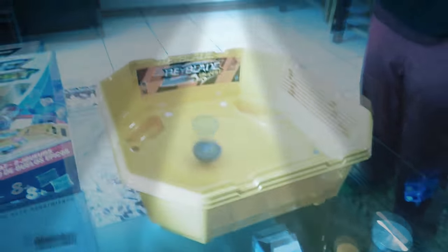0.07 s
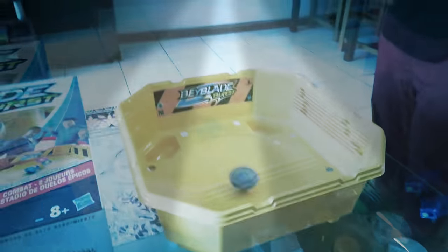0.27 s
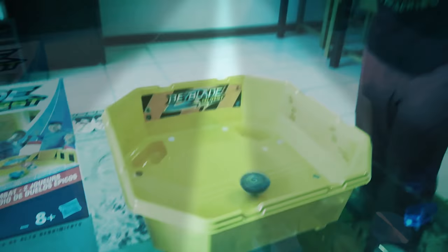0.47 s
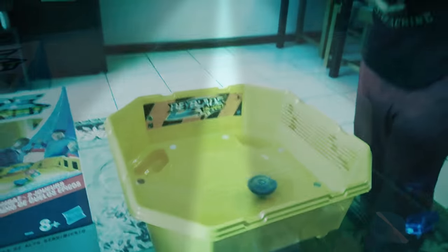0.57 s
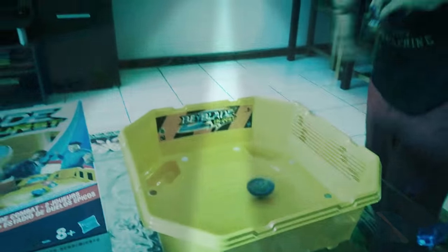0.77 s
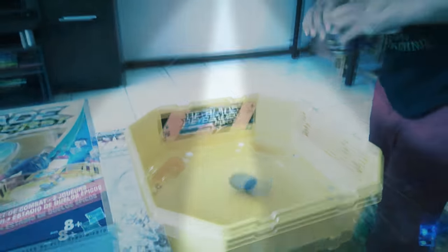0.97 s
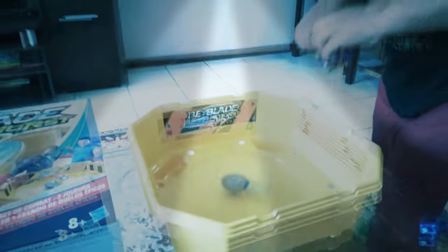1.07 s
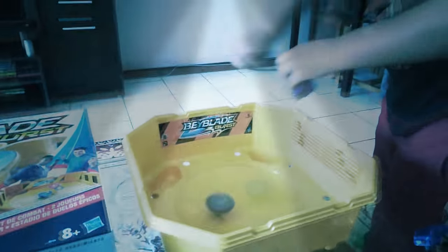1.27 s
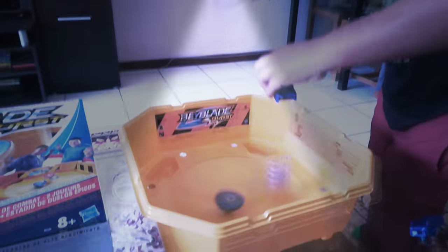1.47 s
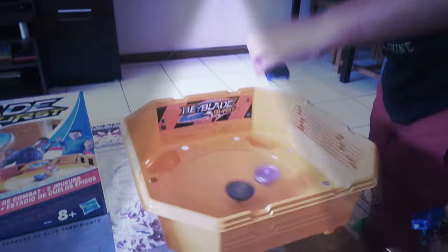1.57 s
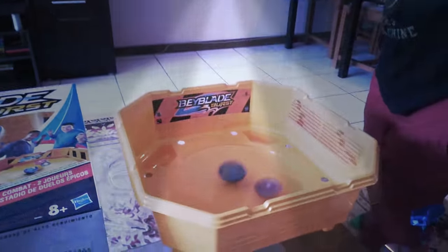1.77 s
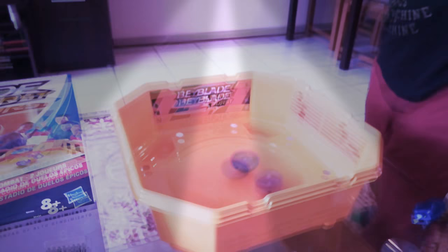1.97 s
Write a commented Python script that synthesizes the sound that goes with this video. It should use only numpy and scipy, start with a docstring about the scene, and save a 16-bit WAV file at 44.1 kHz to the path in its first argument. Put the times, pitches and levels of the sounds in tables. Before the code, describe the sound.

Spinning tops in a plastic arena, snapped together, launched by ripcord, then dropping and knocking

```python
"""A spinning top hums and scrapes softly on a plastic stadium's floor, over room noise and a low rumble.
A second top is snapped tight with four hard clacks: noise cracks over a ring of modes, in a tiled room.
The ripcord zips into the launcher and is pulled: teeth make noise bursts, and the gear whirrs on.
The top drops in with a hollow thump of shell modes and clatter, then knocks against the wall and the other
top with dry noise ticks, while its whirr flutters as resonant noise."""
import sys
import numpy as np
from scipy import signal
from scipy.fft import rfft, irfft, next_fast_len
from scipy.io import wavfile
from scipy.ndimage import map_coordinates

SR = 44100
rng = np.random.default_rng(int(sys.argv[2]) if len(sys.argv) > 2 else 0)


def store_pcm(level_fs):
    """Save levels as 16-bit WAV."""
    pcm = np.round(np.clip(level_fs, -1, 1) * 32767).astype(np.int16)
    wavfile.write(sys.argv[1], SR, np.atleast_2d(pcm).T)


N = 88200
T = np.arange(N) / SR


def amp(db):
    """Decibels to linear gain."""
    return 10 ** (np.asarray(db) / 20)


def unit(x):
    """x scaled to rms 1."""
    return x / np.sqrt(np.mean(x ** 2) + 1e-20)


def along(points, hz):
    """Read (frequency [Hz], value) points on a log frequency axis."""
    point_hz, values = np.transpose(points)
    return np.interp(np.log(hz + 1), np.log(point_hz + 1), values)


def curves(rows):
    """One curve over time for each column after the time."""
    times, *columns = np.transpose(rows)
    return [np.interp(T, times, column) for column in columns]


def during(rows):
    """True from the first row's time to the last."""
    return (T >= rows[0][0]) & (T <= rows[-1][0])


def wobble(rate):
    """A smooth random curve with rate knots a second."""
    knots = rng.standard_normal(int(N * rate / SR) + 4)
    return map_coordinates(knots, [T * rate])


def fade(t60):
    """Exponential decay, down 60 dB after t60 seconds; 1 - fade is a soft onset."""
    return np.exp(-np.log(1000) * T / t60)


def at(x, s):
    """Delay stereo x by s seconds."""
    return np.pad(x, ((0, 0), (round(s * SR), 0)))[:, :N]


def pan(db):
    """Left and right gains; positive dB favours the left."""
    return amp([[db / 2], [-db / 2]])


def filtered(x, response):
    """x times a response of frequency, padded so that its end does not wrap round."""
    size = 2 * next_fast_len(N)
    hz = np.fft.rfftfreq(size, 1 / SR)
    return irfft(rfft(x, size) * response(hz), size)[..., :N]


def resonant(x, peaks):
    """x through parallel resonances of alternating sign, at rms 1."""
    def response(f):
        total = 0
        for k, (centre, width, db) in enumerate(peaks):
            band = 1j * f * width / (centre ** 2 - f ** 2 + 1j * f * width)
            total = total + (-1) ** k * amp(db) * band
        return total
    return unit(filtered(x, response))


def coloured(x, colour):
    """x with a broad colour, at rms 1."""
    return unit(filtered(x, lambda f: amp(along(colour, f))))


def noise(apart_hz=600, width=1.0):
    """Stereo white noise, alike in the bass and parting in the treble."""
    def turn(f):
        return np.arctan(width * f / (f + apart_hz))
    mid, side = rng.standard_normal((2, N))
    mid = filtered(mid, lambda f: np.cos(turn(f)))
    side = filtered(side, lambda f: np.sin(turn(f)))
    return np.array([mid + side, mid - side])


def dying(x, t60s):
    """x with each frequency fading at its own speed."""
    hz, t, z = signal.stft(x, SR, nperseg=256)
    decay = amp(-60 * t / along(t60s, hz)[:, None])
    return signal.istft(z * decay, SR, nperseg=256)[1][:, :N]


def ring(modes, detune, spread):
    """Struck modes, retuned a little at each blow, their phases parting left from right in the treble."""
    out = 0
    for hz, db, t60 in modes:
        phase = rng.uniform(0, 2 * np.pi) + spread * hz / (hz + 500) * rng.standard_normal((2, 1))
        mode_hz = hz * (1 + detune * rng.standard_normal())
        out = out + amp(db) * fade(t60) * np.sin(2 * np.pi * mode_hz * T + phase + 0.5 * wobble(60))
    return out


STRIKE_RIPPLE_DB, STRIKE_RIPPLE_HZ = 2.5, 650  # random spread and spacing of the colour's knots


def struck_anew(x):
    """Each blow lands on another spot and brings out other resonances."""
    gains_db = STRIKE_RIPPLE_DB * rng.standard_normal(SR // STRIKE_RIPPLE_HZ)
    return unit(filtered(x, lambda f: amp(map_coordinates(gains_db, [f / STRIKE_RIPPLE_HZ]))))


# decay of the tiled room: (frequency [Hz], t60 [s])
ROOM_DECAY = [(150, 0.51), (1000, 0.53), (4000, 0.42), (8000, 0.35), (15000, 0.18)]
# bounces off nearby surfaces: (delay [s], level before echo_db [dB], left over right [dB])
NEAR_BOUNCES = [(.0078, -18, -4.5), (0.0137, -15.5, 0.5), (0.0216, -25.5, 5.5)]


def room(x, wet_db, echo_db=0):
    """Direct sound, bounces off nearby surfaces and the room's diffuse tail."""
    tail = dying(noise(apart_hz=195, width=0.92), ROOM_DECAY)
    tail = tail * (1 - fade(0.014)) * amp(1.3 * wobble(408))
    tail = at(tail, .006) / np.linalg.norm(tail[0])
    early = sum(amp(db + echo_db) * pan(pan_db) * at(x, s) for s, db, pan_db in NEAR_BOUNCES)
    return x + early + amp(wet_db) * signal.fftconvolve(x, tail, axes=1)[:, :N]


# swell of the low rumble: (time [s], level [dB])
RUMBLE_LEVEL = [(0, -62.5), (.17, -54), (.3, -64), (.6, -69.5), (1.0, -63), (1.45, -73), (1.6, -55),
                (2, -65)]
# tone of the rumble: (frequency [Hz], level [dB])
RUMBLE_TONE = [(20, -2), (65, -7.5), (95, 4), (130, -6), (300, -31.5)]
# tone of the steady room noise: (frequency [Hz], level [dB])
ROOM_NOISE_TONE = [(25, -0.5), (150, -8), (400, -11), (1300, -5.5), (15000, -30)]
ROOM_NOISE_DB = -67


def background():
    """Low rumble and faint room noise, both coloured noise."""
    rumble_db, = curves(RUMBLE_LEVEL)
    rumble = amp(rumble_db) * coloured(noise(), RUMBLE_TONE)
    return rumble + amp(ROOM_NOISE_DB) * coloured(noise(), ROOM_NOISE_TONE)


# tips running on the floor: (time [s], hum level [dB], scrape level [dB])
ROLL_LEVELS = [(0, -53.5, -46.5), (.1, -55.5, -48.5), (.2, -65.5, -53), (.55, -69.5, -56), (.75, -70, -76),
               (.9, -56, -55), (1.04, -56, -95), (1.14, -68.5, -64.5), (1.35, -62.5, -53.5),
               (1.5, -59.5, -55.5), (1.8, -44.5, -46), (2, -80, -61)]
# resonances of the hum: (centre [Hz], width [Hz], level [dB])
HUM_RESONANCES = [(144.2, 6.1, 6), (222.3, 52, -7.5)]
# tone of the scrape: (frequency [Hz], level [dB])
SCRAPE_TONE = [(200, -11), (850, -12), (1150, 4.5), (1500, -1), (1900, 3), (3200, -6.5), (7000, -4.5),
               (10000, -16.5), (15000, -17.5)]


def rolling():
    """Spinning tips make the stadium floor hum and scrape over it."""
    hum_db, scrape_db = curves(ROLL_LEVELS)
    hum = amp(hum_db) * resonant(noise(), HUM_RESONANCES)
    scrape = amp(scrape_db + 0.52 * wobble(99)) * coloured(noise(), SCRAPE_TONE)
    return hum + scrape


# handling of the launcher: (time [s], level [dB])
SCUFF_LEVEL = [(.965, -66), (1.005, -51), (1.025, -47.5), (1.07, -55), (1.12, -61)]
# tone of the rub: (frequency [Hz], level [dB])
SCUFF_TONE = [(70, -10), (150, -3), (600, -7), (1400, -0.5), (2300, -5), (5000, -11.5), (9000, -19.5),
              (15000, -29)]


def scuff():
    """A soft rub, as coloured noise, as the launcher is gripped and raised."""
    level_db, = curves(SCUFF_LEVEL)
    level = amp(level_db + 2.2 * wobble(78.5)) * during(SCUFF_LEVEL)
    return room(level * pan(-7.5) * coloured(noise(), SCUFF_TONE), wet_db=-11.5)


# the fresh top's whirr: (time [s], level [dB])
WHIRR_LEVEL = [(1.45, -72), (1.48, -45.5), (1.76, -45.5), (2, -57.5)]
# resonances of the whirr: (centre [Hz], width [Hz], level [dB])
WHIRR_RESONANCES = [(2814, 190, 1), (6760, 3600, -14)]


def whirr():
    """The freshly launched top whirrs as resonant noise, fluttering as it wobbles."""
    level_db, = curves(WHIRR_LEVEL)
    level = amp(level_db + 3.8 * wobble(70.36)) * during(WHIRR_LEVEL)
    return level * resonant(noise(), WHIRR_RESONANCES)


# ripcord fed in: (time [s], level [dB], tooth rate [1/s])
FEED_MOTION = [(.612, -75, 380), (.622, -46, 453), (.70, -45.5, 646), (.75, -43.5, 684), (.81, -44, 720),
               (.875, -48, 496), (.905, -73.5, 390)]
# tone of the feeding teeth: (frequency [Hz], level [dB])
FEED_TONE = [(200, -10.5), (1400, -1.5), (1900, -7), (2700, 2.5), (4200, 1), (6000, 4), (8000, 1),
             (11000, -9.5), (15000, -28)]
# whine of the sliding cord: (settled centre [Hz], width [Hz], level [dB])
WHINE_BANDS = [(2446, 260, -5.5), (3620, 260, -6.5), (5020, 200, 2.5), (6630, 360, -5)]
# faint low tone as the cord goes in: (time [s], pitch [Hz], level [dB])
LOW_TONE = [(.62, 570, -75), (.68, 633, -61.5), (.74, 730, -76)]
WHINE_FLAT, WHINE_RISE_S = 0.04, 0.17  # starts this share flat and settles over this time
WHINE_DB, WHINE_BITE_DB = -3.5, 4  # settled level, and the extra while the cord is still slow


def cord_feed():
    """The cord zips in softly; its whine bites at once and rises as it gets up to speed."""
    level_db, rate = curves(FEED_MOTION)
    turns = np.cumsum(rate * (1 + 0.041 * wobble(90))) / SR
    teeth = unit(np.exp(-(turns % 1) / rate / 0.00032) * amp(0.93 * wobble(100)))
    slow = np.exp(-(np.maximum(T - FEED_MOTION[0][0], 0) / WHINE_RISE_S) ** 2)
    clock = np.cumsum(1 - WHINE_FLAT * slow) / SR  # runs slow at first, so all bands start flat

    def band(hz, width):
        drift = wobble(width) + 1j * wobble(width)
        return np.real(drift * np.exp(2j * np.pi * hz * clock))

    def whine_channel():
        return sum(amp(db) * band(hz, width) for hz, width, db in WHINE_BANDS)

    whine = unit(np.array([whine_channel(), whine_channel()]))
    zip_noise = coloured(teeth * noise(), FEED_TONE)
    cord = amp(WHINE_DB + WHINE_BITE_DB * slow) * whine + amp(-5) * zip_noise
    tone_hz, tone_db = curves(LOW_TONE)
    tone = unit(np.sin(2 * np.pi * np.cumsum(tone_hz) / SR))
    tone = amp(tone_db + 1.8 * wobble(76.7)) * during(LOW_TONE) * tone
    return room((cord * amp(level_db) * during(FEED_MOTION) + tone) * pan(-3.5), wet_db=-7.5)


def ratchet(motion, peaks, colour, rasp_db, scatter_db, tooth_s):
    """Teeth slip past a pawl: every tooth is a tiny burst that rings the launcher's case."""
    level_db, rate = curves(motion)
    turns = np.cumsum(rate * (1 + .08 * wobble(90))) / SR
    size = amp(scatter_db * rng.standard_normal(N))[turns.astype(int)]  # one size per tooth
    teeth = size * np.exp(-(turns % 1) / rate / tooth_s) * during(motion)
    sound = resonant(teeth * noise(), peaks) + amp(rasp_db) * coloured(teeth * noise(), colour)
    # rms 1 while moving, not over the whole length
    return unit(sound) * np.sqrt(during(motion).mean()) * amp(level_db)


# ripcord pulled: (time [s], level [dB], tooth rate [1/s])
PULL_MOTION = [(1.165, -50.5, 250), (1.203, -48.5, 370), (1.238, -26.5, 690), (1.254, -36, 770),
               (1.265, -24, 1200), (1.276, -23.5, 1340), (1.288, -51, 1180), (1.35, -35, 680),
               (1.385, -45, 580), (1.41, -76, 670)]
# case resonances under the pull: (centre [Hz], width [Hz], level [dB])
PULL_RESONANCES = [(7020, 280, 0.5), (7840, 320, -1), (9650, 1600, -8)]
# tone of the pull's rasp: (frequency [Hz], level before rasp_db [dB])
PULL_TONE = [(400, -37), (1400, -19), (3700, -4), (5500, 5.5), (7500, 6.5), (10500, 4.5), (12500, -3.5),
             (15500, -20)]
# gear whirring on: (time [s], level [dB], knock rate [1/s])
GEAR_MOTION = [(1.16, -47, 102), (1.21, -45.5, 132), (1.26, -36.5, 200), (1.31, -35, 160),
               (1.365, -37, 130), (1.39, -46, 145), (1.46, -76, 52)]
# case resonances under the gear: (centre [Hz], width [Hz], level [dB])
GEAR_RESONANCES = [(2610, 234, -2.5), (2840, 480, -6.5), (3175, 270, -7.5), (5860, 270, -10.5)]
# tone of the gear's rasp: (frequency [Hz], level before rasp_db [dB])
GEAR_TONE = [(500, -35), (1350, 9.5), (2000, -4), (2700, 16), (3700, 7), (9000, -3)]


def launcher():
    """The cord is ripped out over fine teeth and leaves the gear whirring with even knocks."""
    pull = ratchet(PULL_MOTION, PULL_RESONANCES, PULL_TONE, rasp_db=-1.0, scatter_db=2.2, tooth_s=0.0011)
    gear = ratchet(GEAR_MOTION, GEAR_RESONANCES, GEAR_TONE, rasp_db=-5.5, scatter_db=1.2, tooth_s=0.0022)
    return room(pull * pan(3.6) + gear * pan(0.15), wet_db=-4.0)


# light clicks of hard parts: (time [s], level before a common lift [dB], left over right [dB])
CLICK_HITS = [(1.163, -37.5, 1.5), (1.21, -46, 6), (1.455, -40, 13), (1.486, -38.5, 9), (1.5250, -17.5, 7),
              (1.6083, -29, 8.5), (1.6470, -21.5, 6), (1.6594, -19, 0), (1.672, -36, -7),
              (1.6990, -16.5, 3), (1.725, -27.5, 2), (1.7892, -35, 2)]
# tone of the clicks: (frequency [Hz], level [dB])
CLICK_TONE = [(300, -24), (2200, -1), (4700, 6.5), (5700, 1.5), (7200, 7), (9300, 1.5), (12500, -7),
              (15200, -4.5)]


def clicks():
    """Hard parts touch: dry noise ticks, each with its own colour."""
    out = 0
    for s, db, pan_db in CLICK_HITS:
        tick = struck_anew(coloured(noise(), CLICK_TONE)) * fade(0.025) * (1 - fade(0.00077))
        out = out + at(amp(db + 0.5) * pan(pan_db) * tick, s)
    return room(out, wet_db=-7.0)


# blows on the stadium: (time [s], clatter level [dB], boom level [dB])
THUMP_HITS = [(0.2446, -41, -56), (1.5266, -15.5, -24), (1.545, -35, -40), (1.6070, -31.5, -37.5),
              (1.6610, -30.5, -46), (1.7277, -28, -44.5), (1.7312, -28, -42), (1.7940, -37.5, -53)]
# modes of the stadium's shell: (frequency [Hz], level [dB], t60 [s])
SHELL_RING = [(88, -17.5, .25), (141.8, -8, 0.4), (208, -1.5, 0.24), (533, -9.5, 0.15), (661.5, 1, 0.17),
              (766, -7, .18), (1048, 1, 0.11), (1358, 0.5, 0.15), (1823, -14, 0.12)]
# tone of the clatter: (frequency [Hz], level [dB])
CLATTER_TONE = [(25, -33.5), (55, -8), (120, -1.5), (220, -1.5), (310, -4), (480, -4), (1400, 3.5),
                (2700, 0.5), (4500, -5.5), (8000, -34.5)]
# decay of the clatter: (frequency [Hz], t60 [s])
CLATTER_DECAY = [(150, 0.48), (1000, 0.18), (3000, 0.046), (10000, 0.045)]


def thumps():
    """The thin shell booms in a few modes over a dense, quickly dying clatter."""
    out = 0
    for s, clatter_db, boom_db in THUMP_HITS:
        clatter = coloured(noise(apart_hz=350, width=0.88), CLATTER_TONE)
        clatter = dying(clatter, CLATTER_DECAY) * (1 + 1.5 * fade(0.012))  # extra punch at the start
        boom = ring(SHELL_RING, detune=0.0046, spread=0.906)
        thump = (amp(clatter_db) * clatter + amp(boom_db) * boom) * (1 - fade(0.0067))
        out = out + at(thump, s)
    return room(out * pan(1.2), wet_db=-10.0, echo_db=-14.5)


# snaps and rattles of the top's lock: (time [s], level before a common lift [dB], left over right [dB])
SNAP_HITS = [(0.221, -25, -4), (0.2236, -4, 0), (0.261, -6, -3.5), (.2690, -10, -4.5), (0.274, -20.5, -3.5),
             (0.3106, -5, -3), (0.3565, -8, -2.5)]
# ring of the locking parts: (frequency [Hz], level [dB], t60 [s])
LOCK_RING = [(2958, -15.5, 0.024), (3654, -20, 0.024), (5724, -11.5, 0.0086), (6880, -3, 0.011),
             (8060, -3, 0.017), (9200, -2, 0.013), (9840, 7, 0.011), (10900, -11, 0.0091)]
# tone of the crack: (frequency [Hz], level [dB])
CRACK_TONE = [(150, -48), (1000, -21.5), (2200, -12), (4300, -6.5), (5700, 6), (7400, 3.5), (9800, 2.5),
              (12500, -2), (16000, -15)]


def snaps():
    """Each snap is a short noise crack with a brief ring of the locking parts."""
    out = 0
    for s, db, pan_db in SNAP_HITS:
        crack = struck_anew(coloured(noise(), CRACK_TONE)) * fade(0.022)
        lock = ring(LOCK_RING, detune=0.029, spread=0.72)
        snap = (amp(-1.5) * crack + amp(-5.5) * lock) * (1 - fade(0.0027))
        out = out + room(at(amp(db + 1.5) * pan(pan_db) * snap, s), wet_db=-7.0, echo_db=3.5)
    return out


def scene():
    """All layers, from the background to the snapping top."""
    ambience = background() + rolling() + scuff() + whirr()
    return ambience + cord_feed() + launcher() + clicks() + thumps() + snaps()


TOP_HZ = 15700  # band limit


def record(dry):
    """The recorder rounds off the highest peaks and cuts steeply above its band limit."""
    rounded = dry / (1 + np.abs(dry / .76) ** 6) ** (1 / 6)  # no peak passes 0.76 here
    return filtered(rounded, lambda hz: 1 / np.sqrt(1 + (hz / TOP_HZ) ** 120))


dry = scene()
out = record(dry)
store_pcm(out)
```